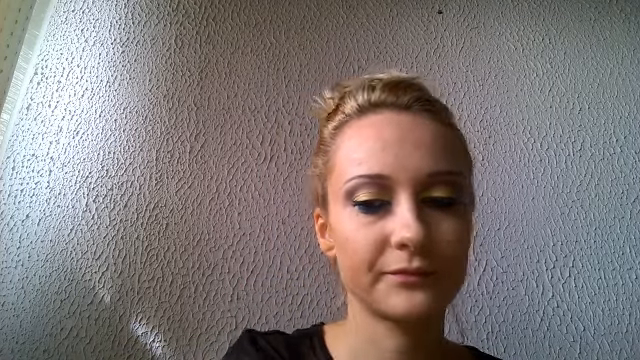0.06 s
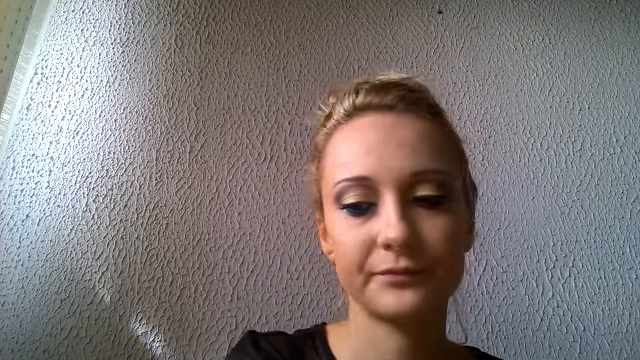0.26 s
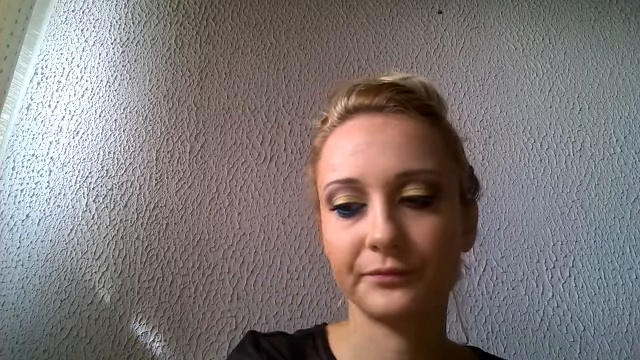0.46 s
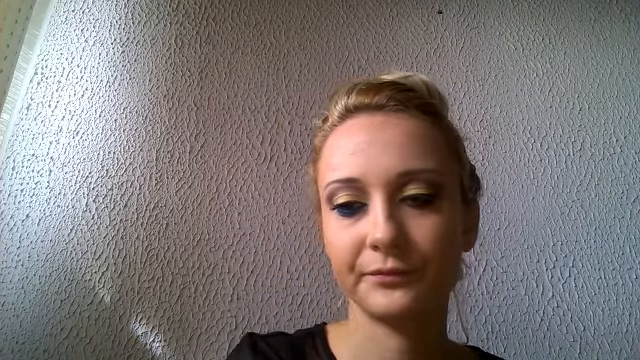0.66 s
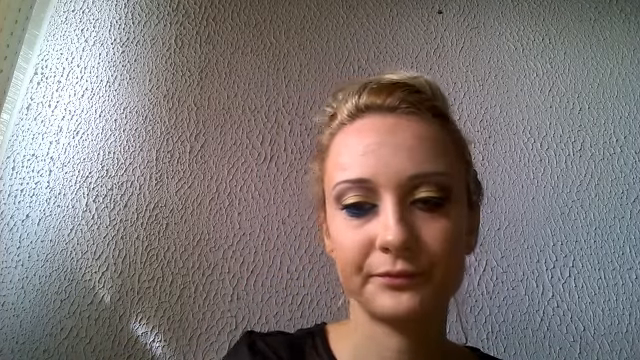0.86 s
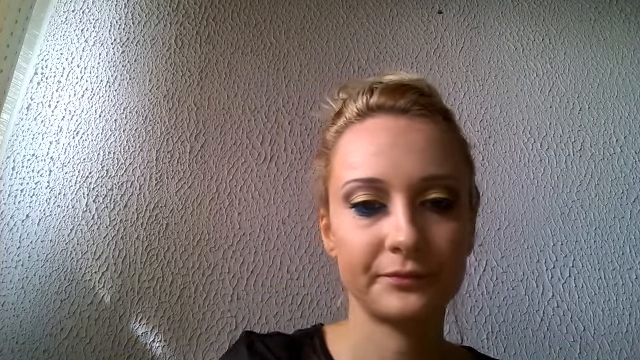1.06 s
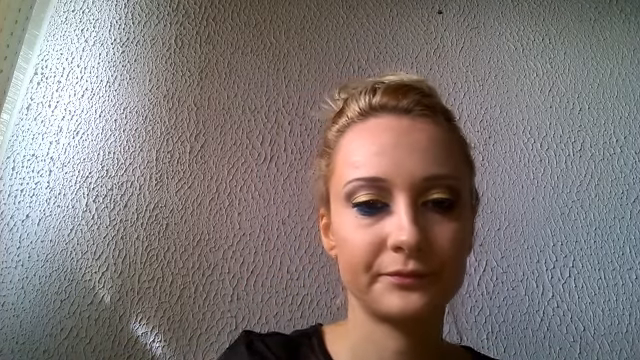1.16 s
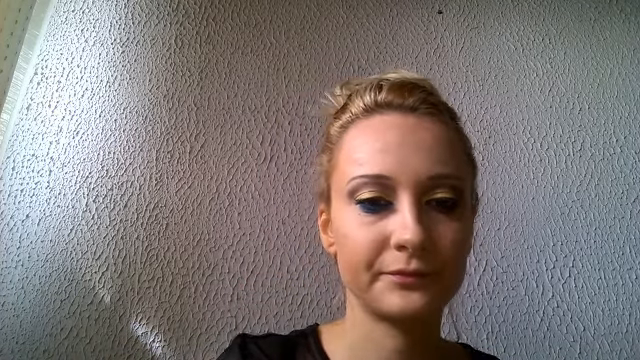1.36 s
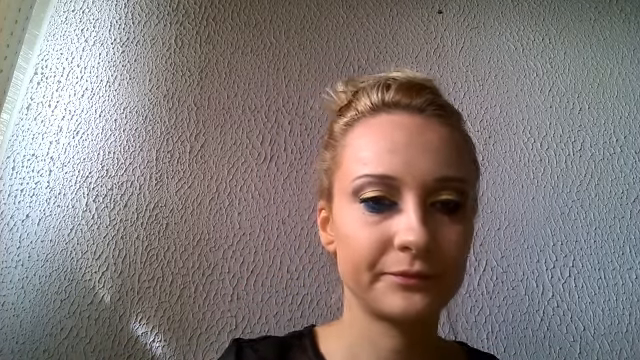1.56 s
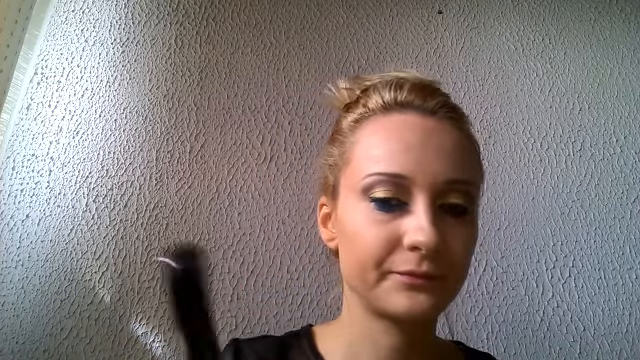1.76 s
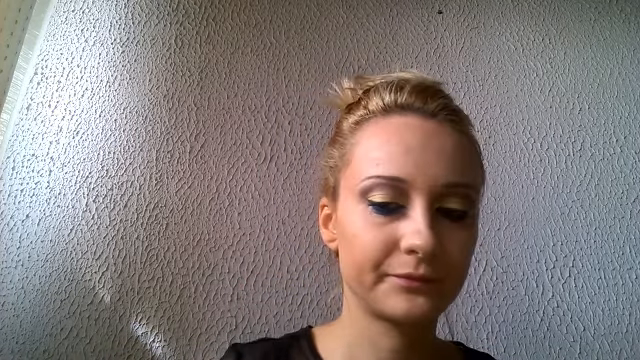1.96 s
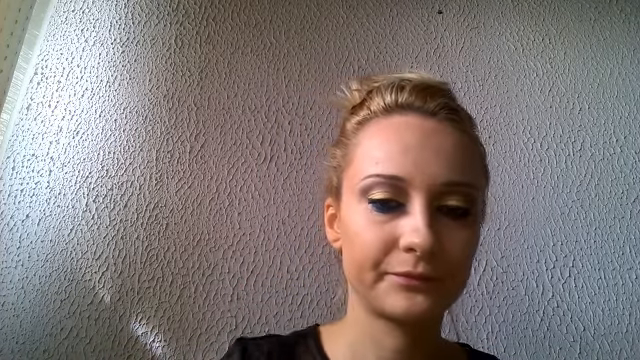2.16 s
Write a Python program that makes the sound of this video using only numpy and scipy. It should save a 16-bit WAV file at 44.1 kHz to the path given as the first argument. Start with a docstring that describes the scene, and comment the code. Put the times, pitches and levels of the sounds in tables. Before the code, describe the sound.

Sharp snap of a small plastic case closing, a knock on the desk, then light brush rattling.

```python
"""A plastic makeup palette snaps shut at a desk in a small quiet room and is set down; then a hand
picks among brushes, whose handles click and slide. The desk booms a little under each blow.
Blows ring banks of damped modes and crack with noise, rubbing is a stream of tiny ringing grains,
and filtered noise gives the room's echoes, hiss and rumble; one brief low hum is a sine."""
import sys
import numpy as np
from scipy import signal
from scipy.fft import rfft, irfft
from scipy.io import wavfile

SR = 44100
rng = np.random.default_rng(int(sys.argv[2]) if len(sys.argv) > 2 else 0)


def unload_wav(signal):
    """Save mono or channel-first audio to the path in sys.argv[1] as 16-bit WAV at rate SR, clipped to [-1, 1]."""
    wavfile.write(
        sys.argv[1],
        SR,
        np.round(np.clip(np.atleast_2d(signal).T, -1, 1) * 32767).astype(np.int16),
    )


def ratio(d):
    """dB to gain"""
    e = np.asarray(d, float) / 20
    return 10 ** e


N = 97020

# the palette lid snaps shut: t/s, level/dB, desk thud level/dB
LID_SNAPS = [(0.2039, -8.5, -23.5)]
# the lid touches again: t after the snap/s, level against the snap/dB
LID_RATTLE = [(.0033, -3), (.0073, -8), (.0183, -12), (.045, -12)]
# colour of the lid's crack: f/Hz, relative level/dB per Hz
LID_CRACK_COLOUR = [(150, -23), (840, 2), (2050, 5.5), (4700, -5.5), (6300, -27.5), (9000, -23),
                    (16000, -42.5)]
# a small pan drops into place: t/s, level/dB, desk thud level/dB
PAN_TAPS = [(0.407, -33, -43.5), (0.4118, -32, -44)]
# ringing modes of the pan: f/Hz, relative level/dB, longest t60/s
PAN_MODES = [(730, 7.5, 0.019), (1645, 10.5, .03), (2720, -2, .02), (4470, -1, .02), (6350, -19, 0.018)]
# the palette is set down: t/s, level/dB, desk thud level/dB
CASE_KNOCKS = [(0.5200, -17.5, -27), (0.524, -29.5, -35)]
# colour of the case's crack: f/Hz, relative level/dB per Hz
CASE_CRACK_COLOUR = [(88, -15), (700, 5), (1830, -2), (5150, -17), (8000, -17.5), (12700, -19.5),
                     (16000, -18)]
# brush handles click: t/s, level/dB, centre of the ring f/Hz, desk thud level/dB
HANDLE_CLICKS = [(0.989, -37.5, 1690, -41), (0.9997, -23, 2970, -40.5), (1.0020, -32, 550, -57),
                 (1.0059, -27, 2900, -36.5), (1.046, -40, 2600, -71), (1.1065, -44, 1710, -49),
                 (1.124, -41, 890, -39), (1.1630, -32.5, 1580, -44.5), (1.2359, -41, 2600, -59),
                 (1.3266, -47.5, 3760, -87), (1.341, -44.5, 1230, -55), (1.3991, -40.5, 1770, -49)]
CRACK_T60_S = 0.023


def rms_one(x):
    """Scaled to rms 1."""
    return x / np.sqrt(np.mean(x ** 2) + 1e-20)


def at_hz(points, hz):
    """Read a table on a log-frequency axis."""
    return np.interp(np.log(hz), np.log(np.array(points)[:, 0]), np.array(points)[:, 1])


def in_time(rows):
    """Read a (time, value) curve at every sample."""
    return np.interp(np.arange(N) / SR, *np.transpose(rows))


def low_pass(x, hz):
    """Second-order low-pass filter."""
    return signal.sosfilt(signal.butter(2, hz, fs=SR, output="sos"), x)


def band_pass(x, low_hz, high_hz):
    """Band-pass filter with second-order skirts."""
    return signal.sosfilt(signal.butter(2, [low_hz, high_hz], "band", fs=SR, output="sos"), x)


def coloured_noise(spectrum):
    """White noise given a spectrum in dB per Hz, at rms 1."""
    white = rng.standard_normal(N)
    hz = np.maximum(np.fft.rfftfreq(N, 1 / SR), 1)
    return rms_one(irfft(rfft(white) * ratio(at_hz(spectrum, hz)), N))


def ring(clicks, hz, t60):
    """A damped resonance: a unit click sets a sine of height about 1 ringing, for 2 ms at least."""
    radius = ratio(-60 / (max(t60, .002) * SR))
    angle = 2 * np.pi * hz / SR
    feedback = [1, -2 * radius * np.cos(angle), radius * radius]
    return signal.lfilter([0, np.sin(angle)], feedback, clicks + 1e-18)


def train(times, gains):
    """Single-sample clicks at the given times."""
    out = np.zeros(N)
    np.add.at(out, (np.asarray(times) * SR).astype(int), gains)
    return out


def bursts(times, levels_db, noise, t60):
    """Noise that starts at each time and dies away exponentially."""
    decay = ratio(-60 / (t60 * SR))
    return noise * signal.lfilter([1], [1, -decay], train(times, ratio(levels_db)) + 1e-18)


def band_burst(s, db, low_hz, high_hz, t60):
    """One dying burst of noise in a band."""
    noise = band_pass(rng.standard_normal(N), low_hz, min(high_hz, .45 * SR))
    return bursts([s], db, rms_one(noise), t60)


def struck(times, levels_db, modes, weights_db=None):
    """Every blow rings every mode with a strength and sign of its own, through a soft contact."""
    plastic_cycles = 20  # longest ring, in cycles to fall 60 dB
    contact_hz = 5700  # softness of a plastic contact
    shape = (len(times), len(modes))
    if weights_db is None:
        weights_db = np.zeros(shape)
    own_db = 2 * rng.normal(0, 1, shape)
    sign = rng.choice([-1, 1], shape)
    rings = 0
    for k, (hz, db, t60) in enumerate(modes):
        gains = ratio(levels_db + db + weights_db[:, k] + own_db[:, k]) * sign[:, k]
        rings = rings + ring(train(times, gains), hz, min(t60, plastic_cycles / hz))
    return low_pass(rings, contact_hz) / np.sqrt(len(modes))


def background():
    """Steady hiss, a wandering band of low rumble and one brief low hum, a swelling sine."""
    # room air and microphone hiss: f/Hz, relative level/dB per Hz
    hiss_colour = [(53, -50), (90, -21.5), (193, 6), (262, -6), (340, 0.5), (526, -12), (948, -12.5),
                   (2590, -16.5), (12400, -17), (15500, -15.5), (16500, -44)]
    # low rumble: t/s, level/dB
    rumble_level = [(0, -65.5), (.27, -49.5), (.6, -55), (1.1, -61.5), (1.3, -63), (1.8, -59),
                    (1.95, -63.5), (2.1, -61)]
    hiss_db = -66
    hum_start_s, hum_length_s, hum_hz, hum_db = .67, .2, 33, -45
    # one extra second lets the rumble filter settle
    rumble = rms_one(band_pass(rng.standard_normal(N + SR), 23.68, 69.46)[SR:])
    hiss = ratio(hiss_db) * coloured_noise(hiss_colour)
    t = np.arange(N) / SR
    swell = np.sin(np.pi * np.clip((t - hum_start_s) / hum_length_s, 0, 1)) ** .5
    hum = ratio(hum_db) * swell * np.sin(2 * np.pi * hum_hz * t)
    return hiss + ratio(in_time(rumble_level)) * rumble + hum


def slide():
    """Fingers and brushes rub: uneven grains ring short patchy resonances and a gliding hollow."""
    # rubbing strength: t/s, level/dB
    slide_level = [(0.06, -86), (0.19, -61.5), (0.22, -73), (0.49, -87), (0.519, -48.5), (0.53, -97),
                   (0.96, -97), (0.99, -45.5), (1.09, -74), (1.115, -48), (1.15, -55), (1.2, -54),
                   (1.26, -50), (1.325, -60.5), (1.345, -54.5), (1.42, -61), (1.495, -81), (1.515, -66),
                   (1.57, -100)]
    # colour of the rubbing: f/Hz, relative level/dB per Hz
    slide_colour = [(200, -10), (560, -3), (800, -1), (1200, -6), (2200, -9.5), (4800, -27), (8000, -45)]
    # a hollow that the rubbing rings: t/s, f/Hz
    hollow_centre = [(1.11, 696), (1.135, 929.4), (1.17, 1180), (1.22, 1090), (1.238, 574), (1.325, 500),
                     (1.345, 1616), (1.385, 1645), (1.41, 800)]
    grains_per_s, grain_spread_db = 5000, 3.0
    grain_cycles = 4.8  # cycles to fall 60 dB
    patchy_db = 3.5
    hollow_db, hollow_half_width_hz = -4.5, 82
    sizes = ratio(grain_spread_db * np.minimum(rng.exponential(1, N), 4)) * rng.choice([-1, 1], N)
    grains = sizes * (rng.random(N) < grains_per_s / SR)
    dealt = rng.integers(0, 32, N)  # which resonance each grain rings
    patches = rng.standard_normal((32, 56))
    rubbing = 0
    for k, hz in enumerate(np.geomspace(200, 8000, 32)):
        patch = np.interp(np.linspace(0, 55, N), np.arange(56), patches[k])
        gain = np.sqrt(hz) * ratio(at_hz(slide_colour, hz) + patchy_db * patch)
        rubbing = rubbing + gain * ring(grains * (dealt == k), hz, grain_cycles / hz)
    # shift the moving centre down to 0 Hz, low-pass, and shift back up
    turn = np.exp(2j * np.pi * np.cumsum(in_time(hollow_centre)) / SR)
    hollow = np.real(turn * low_pass(grains / turn, hollow_half_width_hz))
    return ratio(in_time(slide_level)) * (rms_one(rubbing) + ratio(hollow_db) * rms_one(hollow))


def lid():
    """The lid snaps with ringing modes and a noise crack, then rattles; weaker touches are duller."""
    # ringing modes of the lid: f/Hz, relative level/dB, longest t60/s
    lid_modes = [(563, 0, 0.044), (905, 4.5, 0.03), (1044, 3.5, 0.01), (1799, 8.5, 0.044), (1936, 15, 0.03),
                 (2640, 14.5, 0.011), (3070, 2.5, 0.023), (3610, 14.5, 0.01), (4293, 15, 0.0086),
                 (8600, 14, .004)]
    crack_db = -0.5  # against the snap
    dull_hz = 6000  # at this pitch the loss of a weaker touch doubles
    s, db, _ = np.transpose(LID_SNAPS)
    after_s, touch_db = np.transpose([(0.00041, 0.0077)] + LID_RATTLE)  # the snap itself, then the rattle
    dulling_db = np.outer(touch_db, np.array(lid_modes)[:, 0] / dull_hz)
    rings = struck(s + after_s, db + touch_db, lid_modes, dulling_db)
    return rings + bursts(s, db + crack_db, coloured_noise(LID_CRACK_COLOUR), CRACK_T60_S)


def desk():
    """Soft pushes from the snap, taps, knocks and clicks ring the desk's low modes."""
    # ringing modes of the desk: f/Hz, level/dB, t60/s
    desk_modes = [(56, -13, 0.21), (138.2, -1.5, 0.31), (189.6, -6.5, .25), (237.4, -5.5, 0.26),
                  (364.6, 1, 0.05)]
    soft_hz = 162  # corner of the one-pole softening of each push
    blows = LID_SNAPS + PAN_TAPS + CASE_KNOCKS + HANDLE_CLICKS
    s, thud_db = np.transpose([(row[0], row[-1]) for row in blows])
    pole = np.exp(-2 * np.pi * soft_hz / SR)
    push = signal.lfilter([1 - pole], [1, -pole], train(s, ratio(thud_db)))
    # neighbouring modes take opposite signs
    return sum(ratio(db) * ring(push, hz, t60) * (-1) ** k for k, (hz, db, t60) in enumerate(desk_modes))


def pan():
    """A small pan drops into place: two taps ring its modes, the first with a noise crack."""
    s, db, _ = np.transpose(PAN_TAPS)
    return struck(s, db, PAN_MODES) + band_burst(s[0], db[0] - 13.5, 380, 3400, CRACK_T60_S)


def case():
    """The case meets the desk: its modes ring and each knock cracks with noise."""
    # ringing modes of the case: f/Hz, relative level/dB, longest t60/s
    case_modes = [(269.5, 3.5, 0.049), (550, 0.5, 0.047), (195.3, 1, 0.043), (1430, 1, .015),
                  (2290, 1, .01), (6650, -16, .01), (9000, 8.5, .004)]
    crack_db = -1.5  # against the knock
    s, db, _ = np.transpose(CASE_KNOCKS)
    rings = struck(s, db, case_modes)
    return rings + bursts(s, db + crack_db, coloured_noise(CASE_CRACK_COLOUR), CRACK_T60_S)


def ticks():
    """Thin bright ticks: tiny noise bursts in a wide band around their centre."""
    # ticks: t/s, level/dB, centre f/Hz
    tick_rows = [(0.9563, -46, 11200), (1.002, -39.5, 11500), (1.012, -48, 11000), (1.0280, -49, 13000),
                 (1.0370, -50, 8150), (1.066, -49, 8900), (1.1216, -50.5, 13500), (1.9175, -54.5, 10950)]
    tick_t60_s = 0.017
    return sum(band_burst(s, db, hz * 0.74, hz * 1.28, tick_t60_s) for s, db, hz in tick_rows)


def handles():
    """Clicks crack in a wide band, ring the modes near their own centre; a ferrule buzzes among them."""
    # ringing modes of the brush handles: f/Hz, relative level/dB, longest t60/s
    handle_modes = [(500, 10.5, 0.029), (810, 7.5, 0.024), (1160, 5, 0.031), (1780, 2.5, 0.066),
                    (2120, 4, 0.016), (2600, -1, 0.044), (3440, 12, 0.02), (4930, -10, 0.01)]
    spread_oct = 0.85  # distance from the centre at which a mode is 6 dB weaker
    crack_db = -6.5  # against the click
    s, db, centre_hz, _ = np.transpose(HANDLE_CLICKS)
    distance = np.log2(np.array(handle_modes)[:, 0] / centre_hz[:, None]) / spread_oct
    cracks = sum(band_burst(t, level + crack_db, hz * .4, hz * 2.6, CRACK_T60_S)
                 for t, level, hz in zip(s, db, centre_hz))
    buzz = ferrule()
    return struck(s, db, handle_modes, -6 * distance ** 2) + cracks + buzz


def ferrule():
    """A metal ferrule buzzes: one dying burst of noise in a narrow high band."""
    start_s, level_db, centre_hz, width_hz, t60_s = 1.236, -64, 7180, 310, .3
    return band_burst(start_s, level_db, centre_hz - width_hz / 2, centre_hz + width_hz / 2, t60_s)


def reflections(colour_db):
    """Half-octave noise bands build up together and die each at its own rate, coloured in dB per Hz."""
    # decay of the room: f/Hz, t60/s
    room_decay = [(150, .35), (300, 0.38), (700, 0.23), (1800, 0.28), (4800, 0.22), (12800, 0.074)]
    build_s = 0.0013
    t = np.arange(SR // 2) / SR
    edges = 90 * 2 ** np.arange(0, 7.6, .5)
    white = rng.standard_normal((2, len(t)))  # neighbouring bands use different noise
    tail, power = 0, 0
    for k, (low, high) in enumerate(zip(edges, edges[1:])):
        hz = np.sqrt(low * high)
        band = ratio(colour_db(hz)) * band_pass(white[k % 2], low, high)
        tail = tail + band * ratio(-60 * t / at_hz(room_decay, hz))
        power = power + np.mean(band ** 2)
    return tail * (1 - np.exp(-t / build_s)) / np.sqrt(power)


def room(close):
    """The ringing and rubbing as the walls return it: convolved with a decaying noise tail."""
    room_db = -12
    tail = reflections(lambda hz: 0)
    return ratio(room_db) * signal.fftconvolve(close, tail / np.sqrt(np.sum(tail ** 2)))[:N]


def echo(s, db, colour_db):
    """A sharp blow scatters round the room as an even wash of its own colour."""
    return signal.fftconvolve(train([s], ratio(db)), reflections(colour_db))[:N]


def echoes():
    """The scattered wash after the lid and its last touch, the pan, the case and each handle."""
    lid_db, case_db, small_db = -8.5, -15.5, -18.5  # against the level of the blow
    s, db, _ = LID_SNAPS[0]
    wash = echo(s, db + lid_db, lambda hz: at_hz(LID_CRACK_COLOUR, hz))
    last_s, last_db = LID_RATTLE[-1]
    wash = wash + ratio(last_db) * np.roll(wash, int(last_s * SR))
    s, db, _ = CASE_KNOCKS[0]
    wash = wash + echo(s, db + case_db, lambda hz: at_hz(CASE_CRACK_COLOUR, hz))
    # the handles and the first pan tap, each wash centred on a pitch
    hits = [row[:3] for row in HANDLE_CLICKS] + [(*PAN_TAPS[0][:2], PAN_MODES[1][0])]
    for s, db, centre_hz in hits:
        wash = wash + echo(s, db + small_db, lambda hz: -2.5 * np.log2(hz / centre_hz) ** 2)
    return wash


def scene():
    """All handling sounds, their room, the desk and the background."""
    close = lid() + pan() + case() + handles() + ticks() + slide()
    return (close + room(close) + echoes() + desk() + background())[None, :]


def top_cut(x):
    """Nothing passes above the cut-off."""
    return signal.sosfilt(signal.butter(12, 16710, fs=SR, output="sos"), x)


def record(dry):
    """Peaks are rounded by a soft overload and the top is cut by a steep low-pass."""
    overload, cutoff_hz = .95, 15900  # overload ceiling as a share of full scale
    rounded = overload * np.tanh(dry / overload)
    mix = signal.sosfilt(signal.ellip(10, .5, 60, cutoff_hz, fs=SR, output="sos"), rounded)
    return top_cut(mix)


dry = scene()
out = record(dry)
unload_wav(out)
```